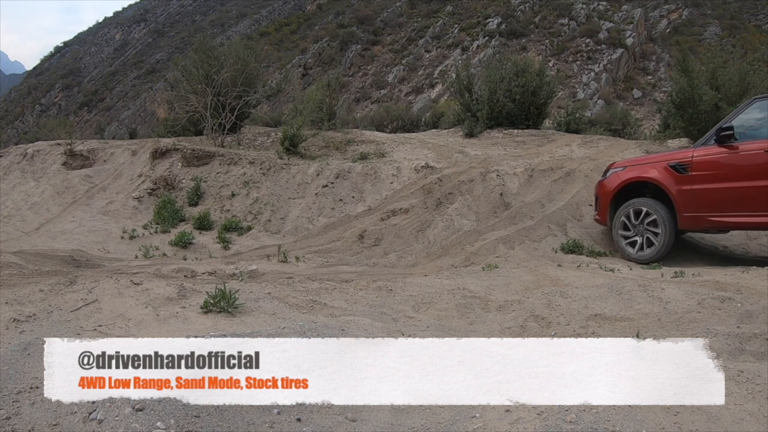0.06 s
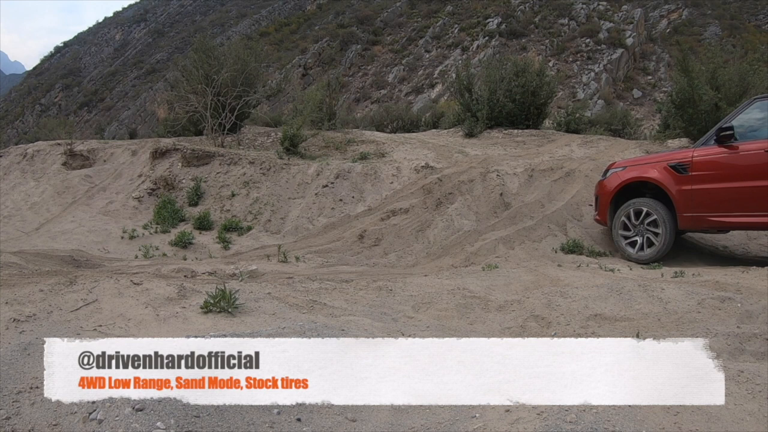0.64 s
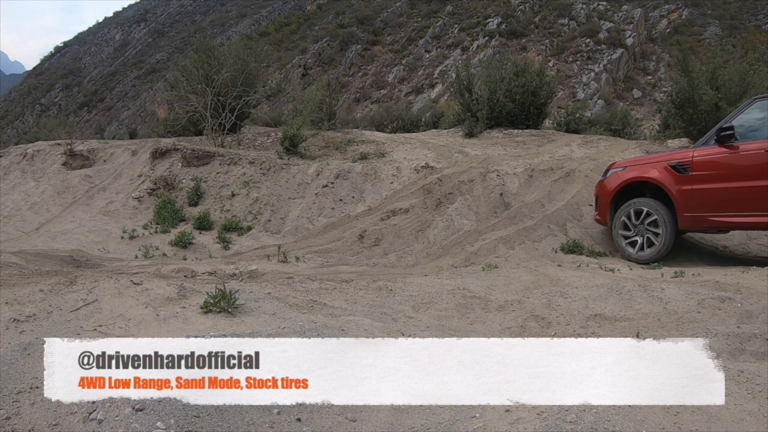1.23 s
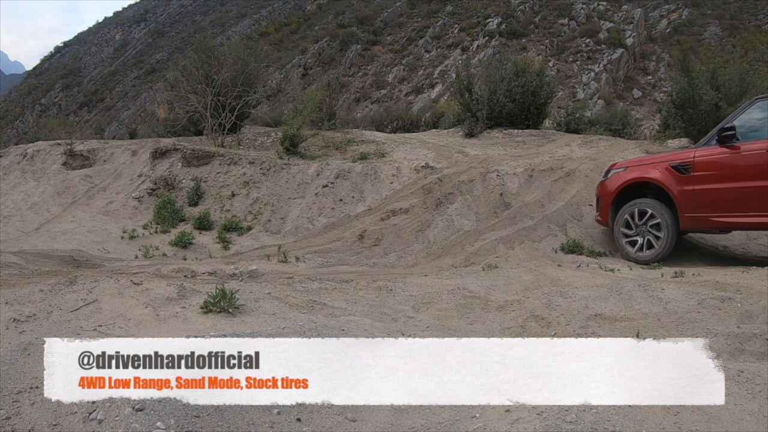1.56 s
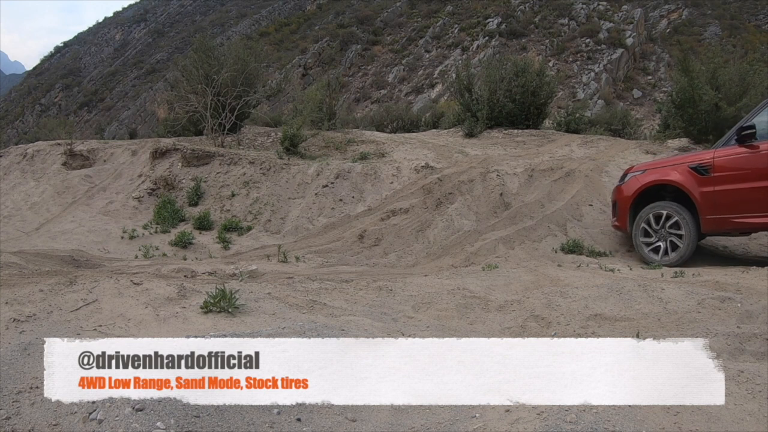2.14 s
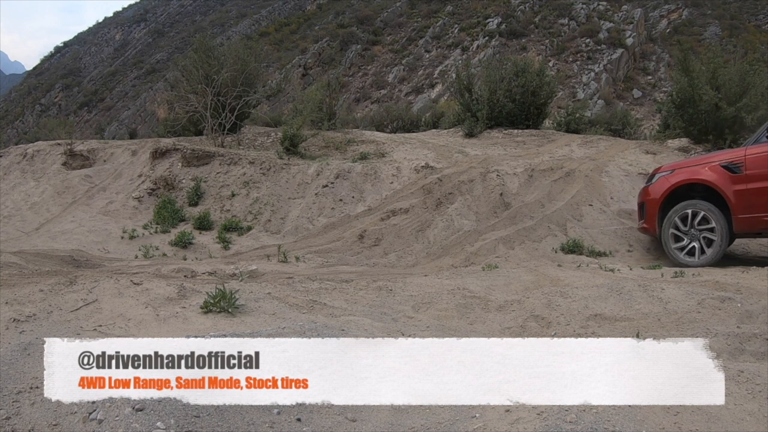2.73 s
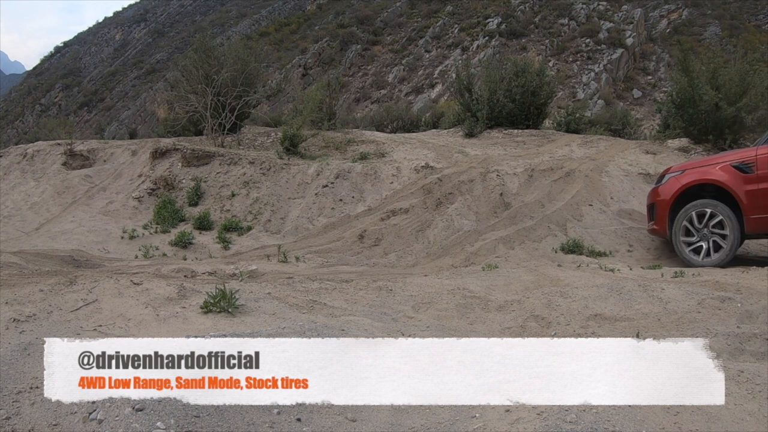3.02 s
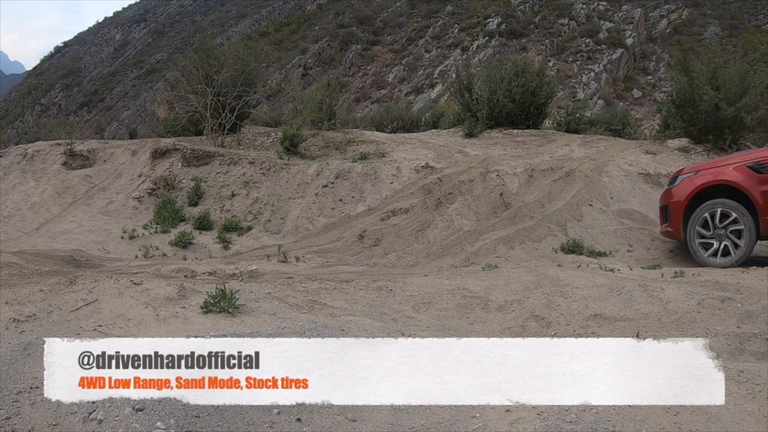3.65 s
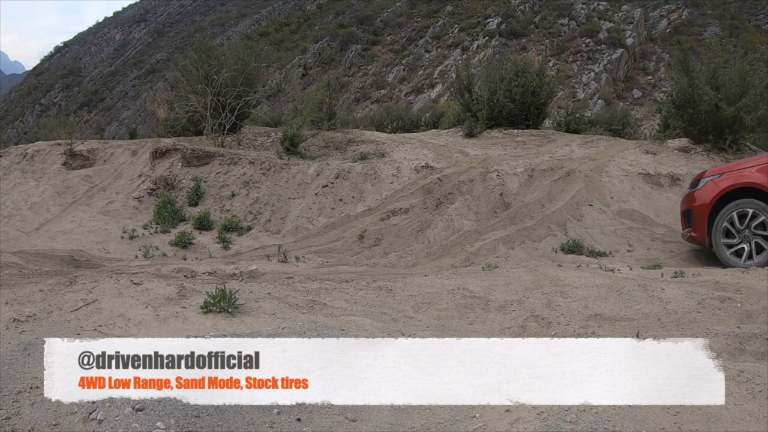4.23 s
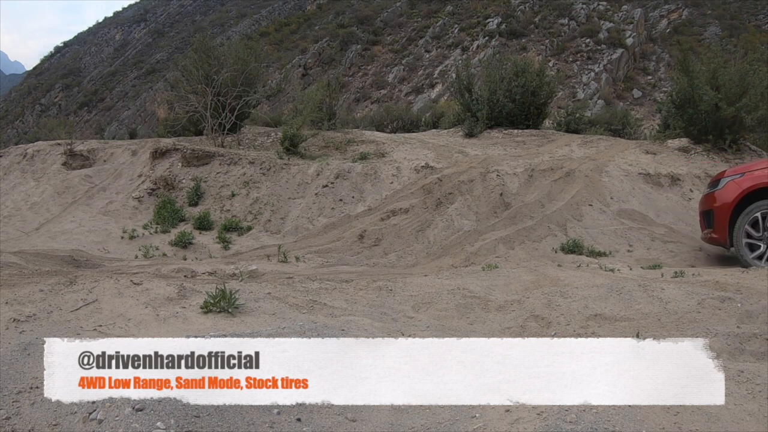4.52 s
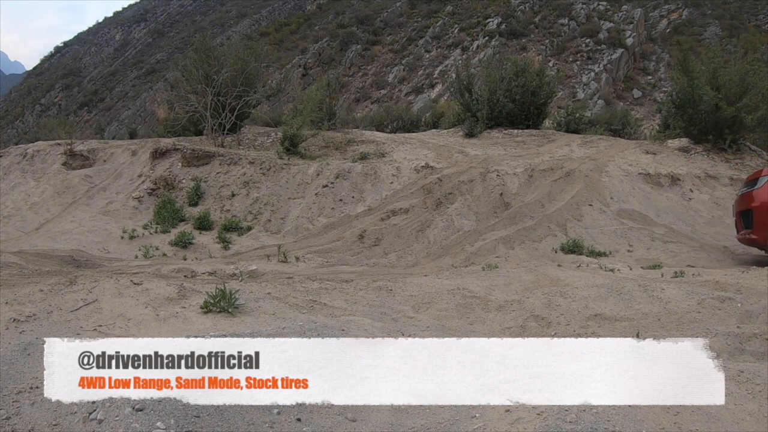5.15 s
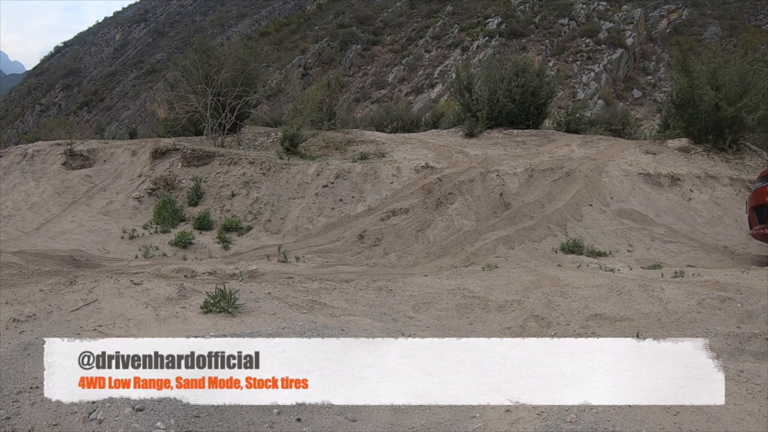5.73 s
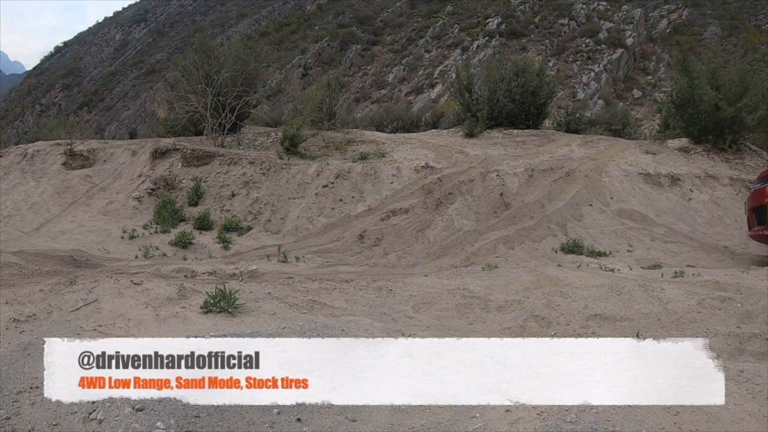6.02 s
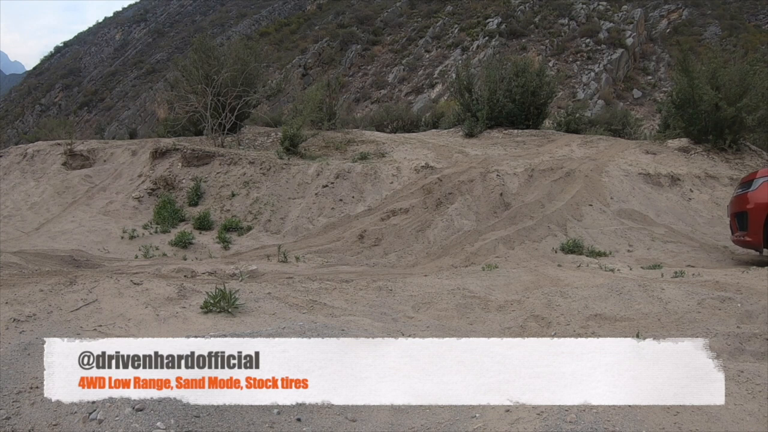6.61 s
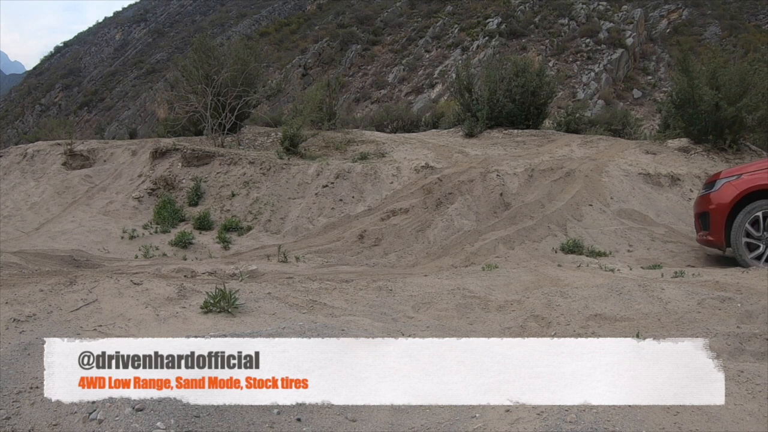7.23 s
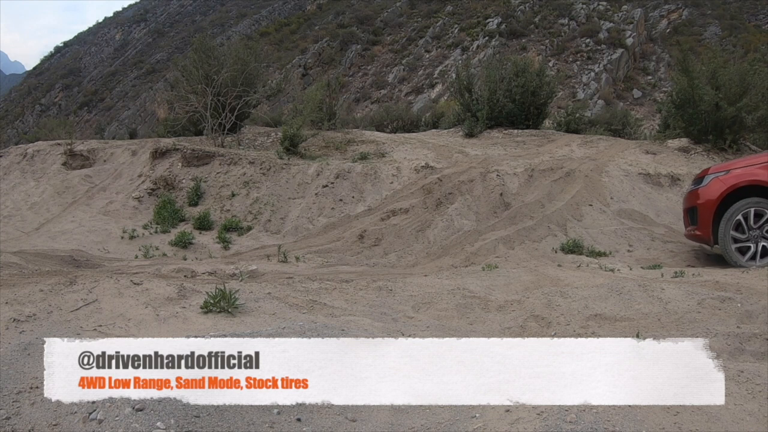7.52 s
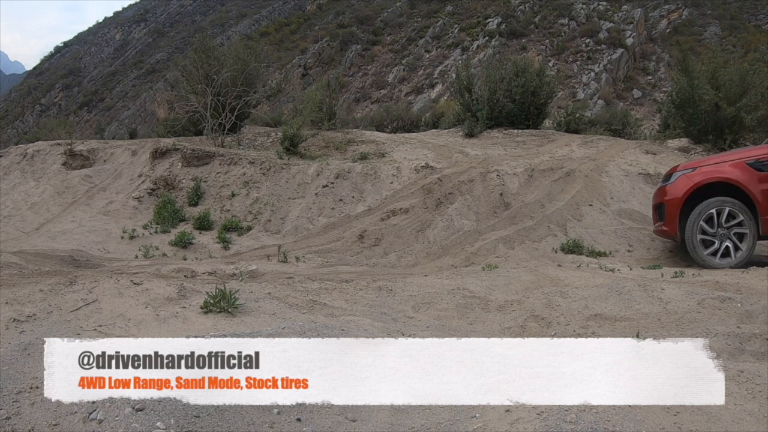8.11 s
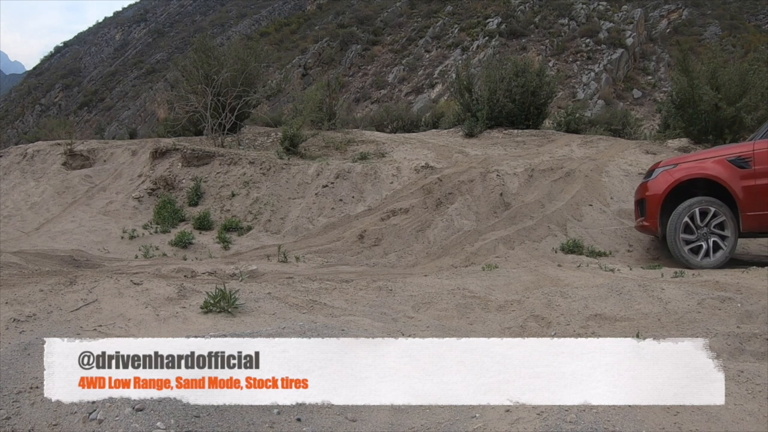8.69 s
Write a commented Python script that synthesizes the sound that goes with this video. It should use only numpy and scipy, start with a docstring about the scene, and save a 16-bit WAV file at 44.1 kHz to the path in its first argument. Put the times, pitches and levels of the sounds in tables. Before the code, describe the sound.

A large off-road vehicle's engine rumbles and revs once as its tyres grind sand and crack stones, with gusts of wind.

```python
"""Off-roader on a sandy slope

A V8 crawls a few metres to the right: it strains, rolls back, revs once and creeps forward. Its firing
pulses excite the exhaust, where the two banks boom in sum and burble in difference; the engine bay whirrs.
The tyres grind sand and crack stones, and blows set the rim and suspension ringing in their modes.
Small birds call far off in the valley air, and gusts of wind buffet the listener."""
import sys
import numpy as np
from scipy import signal
from scipy.fft import rfft, irfft, next_fast_len
from scipy.io import wavfile
from scipy.ndimage import uniform_filter1d

SR = 44100
rng = np.random.default_rng(int(sys.argv[2]) if len(sys.argv) > 2 else 0)


def transcribe(signal):
    """Save signal, clipped to [-1, 1], as a 16-bit WAV file at the path in sys.argv[1]."""
    frames = np.atleast_2d(signal).T
    limited = np.clip(frames, -1, 1)
    pcm = np.round(limited * 32767).astype(np.int16)
    wavfile.write(sys.argv[1], SR, pcm)


N = 386299
T = np.arange(N) / SR
FREQ = np.maximum(np.linspace(0, SR / 2, next_fast_len(N) + 1), 1)

# the eight cylinders in firing order: (bank as +1 or -1, level/dB)
FIRING_ORDER = [(1, 0), (-1, 0.9), (1, -1.5), (1, 0), (-1, 1), (1, -0.1), (-1, -1.5), (-1, 1.5)]


def exhaust(firings, octaves, load_db, scatter_db=0.47, jitter_s=.0001):
    """Source and filter: the banks' summed pulses boom; their difference burbles between the harmonics."""
    # spectral envelopes of the banks' sum, their difference and the turbulent gas: (f/Hz, level/dB)
    boom_response = [(15, -16.5), (35, -0.5), (48, 5.5), (76, -2), (90, -8.5), (118, -16), (138, -9),
                     (154, -12), (172, -20), (220, -29), (400, -42.5), (900, -70.5)]
    burble_response = [(15, -41.5), (27, -10), (36, 3.5), (47, 6.5), (60, 0.5), (95, -0.5), (120, 5.5),
                       (145, 3.5), (190, -5.5), (260, -19.5), (320, -17.5), (900, -49.5)]
    gas_spectrum = [(20, -25.5), (50, -4.5), (100, 1.5), (160, -1), (220, -6), (350, -20.5), (900, -39)]
    count = np.arange(1, int(firings[-1]))
    bank, cylinder_db = np.array(FIRING_ORDER)[count % len(FIRING_ORDER)].T
    late, strong = rng.standard_normal((len(count), 2)).T
    at = np.clip(np.interp(count, firings, np.arange(N)) + jitter_s * SR * late, 0, N - 2)
    size = undb(cylinder_db + scatter_db * strong)
    boom = steady(colour(impulses(at, size) - np.gradient(firings), boom_response))
    # the banks have pipes of their own, so the burble lags and fills the gaps between the booms
    burble = colour(impulses(at, size * np.sign(bank)), burble_response)
    burble = steady(muffler(burble, hz=140.3, width_hz=75))
    shade_db = -3 * swells([(6.3, 2.9, 0)])  # the vehicle is farthest down the slope at 6.3 s
    # under load the pulses outgrow the turbulent gas: the engine sounds cleaner when it pulls
    boom_db = -38 + 6 * octaves + load_db
    burble_db = -42.5 + 11.5 * octaves + 0.61 * load_db + shade_db
    gas_db = -43.5 + 10.5 * octaves + 0.19 * load_db
    pulses = boom * undb(boom_db) + burble * undb(burble_db)
    gas = unit(colour(rng.standard_normal(N), gas_spectrum)) * undb(gas_db)
    return lowpass(gas - muffler(pulses), 1200)  # the muffler's packing absorbs the treble


def muffler(x, hz=70, width_hz=60):
    """All-pass dispersion: the chambers delay the band around their resonance and smear every pulse."""
    radius = np.exp(-np.pi * width_hz / SR)
    poles = [1, -2 * radius * np.cos(2 * np.pi * hz / SR), radius * radius]
    return signal.lfilter(poles[::-1], poles, x)


def load(attack_s=0.074, sag_s=0.91, release_s=0.19):
    """Relaxation: exhaust pressure (dB over idle) builds, sags as the wheels slip, falls on release."""
    # presses of the accelerator: (t/s, time held/s, scale of the added pressure/dB re idle)
    presses = [(-.12, 0.85, 9), (.74, 0.48, 11), (1.4, 0.17, -2), (1.63, 0.18, 13), (2.02, 0.54, 6.5),
               (3.39, 0.74, 15), (4.6, 0.24, 0.5), (5.24, 0.89, 10.5), (6.27, 0.26, 7), (7.66, 0.28, 12.5),
               (8.51, 0.39, 11)]
    pressure = 1
    for s, held_s, db in presses:
        t = np.maximum(T - s, 0)
        build = 1 - np.exp(-t / attack_s)
        fall = np.exp(-t / sag_s - np.maximum(t - held_s, 0) / release_s)
        pressure = pressure + undb(db) * build * fall
    return 20 * np.log10(pressure)


def lope(firings, octaves, load_db, waver_db=1.2, pipe_cutoff_hz=205):
    """Periodicity: unequal cylinders repeat each engine cycle, adding lines between the harmonics."""
    # spectral lines: (multiple of the cycle rate, level/dB)
    orders = [(5, -9), (9, -5), (10, -.5), (13, -7), (14, -6.5), (15, -1), (18, -0.5), (20, -5), (22, -7.5),
              (26, -10)]
    cycles = firings / len(FIRING_ORDER)
    lines = sum(undb(db + waver_db * walk(2.6)) * np.sin(2 * np.pi * (order * cycles + rng.random()))
                for order, db in orders)
    return lowpass(lines, pipe_cutoff_hz) * undb(-51.5 + octaves + 0.64 * load_db)


def intake(firings, octaves, waver_db=1, idle_db=-52, db_per_octave=29):
    """Even harmonics of the firing rate drone in the intake and stand out only at high revs."""
    # partials of the drone: (multiple of the firing rate, level/dB)
    harmonics = [(2, -3.5), (4, -26.5), (6, -29.5)]
    drone = sum(undb(db + waver_db * walk(5.5)) * np.sin(2 * np.pi * k * firings) for k, db in harmonics)
    return drone * undb(idle_db + db_per_octave * octaves)


def engine_bay(firings, octaves, throb=0.041, flutter_db=1.0, panel_hz=452):
    """Flow noise of intake and fan grows with speed and throbs with the firings; a panel resonates."""
    # flow noise: (f/Hz, level/dB)
    spectrum = [(100, -12), (250, -4.5), (360, -0.5), (450, 0), (560, 0.5), (700, -1), (870, 0),
                (1050, -4.5), (1300, -11), (1900, -23.5), (3000, -27.5), (6000, -37)]
    # the panel hums most as the engine comes off load: (centre t/s, duration/s, level/dB re flow noise)
    hum_swells = [(2.1, 1, -6.5), (3.4, 11, -12)]
    rush = rng.standard_normal(N) * (1 + throb * np.cos(2 * np.pi * firings))
    rush *= undb(flutter_db * walk(14))
    hum = unit(band(rng.standard_normal(N), panel_hz - 13, panel_hz + 13)) * swells(hum_swells)
    return (unit(colour(rush, spectrum)) + hum) * undb(-46 + 6.5 * octaves)


def tyres(load_db, roll_db=-53, load_share=0.027, scrub_db=-6, bumps_db=1.0):
    """Cavity resonance: the air in the tyres rumbles; where they dig in it swells and the tread scrubs."""
    # the tyres dig in and churn: (centre t/s, duration/s, level/dB)
    digs = [(.3, 0.42, -42), (1.55, 2.68, -40.5), (8.68, 0.13, -48.5)]
    digging = swells(digs)
    cavity = band(band(rng.standard_normal(N), 157, 311), 157, 311)
    rumble = unit(cavity * undb(bumps_db * walk(12)))
    scrub = unit(band(rng.standard_normal(N), 290, 1010))
    return rumble * (undb(roll_db + load_share * load_db) + digging) + scrub * undb(scrub_db) * digging


def sand(grains_per_s=500, grain_db=-9):
    """Friction noise: sand ground by the tyres hisses, with grain impacts of power-law strength."""
    # grinding sand: (f/Hz, level/dB)
    spectrum = [(400, -15), (1200, 0.5), (2000, 0.5), (2500, 1.5), (3000, 4.5), (3400, 1.5), (3900, -4),
                (5500, -7.5), (6600, -5.5), (7400, 2), (8200, -15.5), (10000, -12.5), (12000, -33),
                (14500, -39)]
    # how hard the tyres grind: (t/s, level/dB)
    grind = [(0, -54.5), (.8, -55), (1.6, -53), (2.3, -54.5), (3.3, -55.5), (3.98, -49), (4.35, -54.5),
             (5.3, -57.5), (6.7, -60.5), (7.25, -56), (8.3, -56), (8.76, -53)]
    when, chance = rng.random((int(grains_per_s * N / SR), 2)).T
    size = np.maximum(chance, .01) ** -.4
    grains = unit(impulses(when * (N - 2), size * rng.choice([-1, 1], len(size))))
    hiss = rng.standard_normal(N) * undb(.5 * walk(18))
    return unit(colour(hiss + undb(grain_db) * grains, spectrum)) * undb(over_time(grind))


def scrunch(slips_per_s=900, uneven_db=3.0):
    """Stick-slip: the tread packs the sand, which gives way in dense, uneven little slips."""
    # packing sand: (f/Hz, level/dB)
    spectrum = [(200, -18), (350, -3.5), (570, 1), (950, -7), (1300, -17), (2500, -26), (6000, -46)]
    # surges of slipping: (centre t/s, duration/s, level/dB)
    surges = [(3.66, 0.35, -41.5), (3.97, 0.57, -43.5), (4.22, 0.17, -43), (4.5, 0.078, -49),
              (4.66, 0.16, -46), (5.06, 0.23, -49), (5.27, 0.21, -43.5), (8.72, 0.26, -51)]
    when, size = rng.random((int(slips_per_s * N / SR), 2)).T
    slips = impulses(when * (N - 2), size - .5)
    return unit(colour(slips, spectrum) * undb(uneven_db * walk(35))) * swells(surges)


def thuds(rise_s=0.0088, lo_hz=235, hi_hz=370):
    """Damped impact: a soft push on the tyre wall dies away in a few cycles."""
    # a tyre drops into a rut: (t/s, level/dB)
    drops = [(.958, -39), (4.724, -41), (5.922, -41.5)]
    out, t = np.zeros(N), T[:SR // 8]
    for s, db in drops:
        push = unit(band(rng.standard_normal(len(t)), lo_hz, hi_hz))
        add(out, s, undb(db) * push * t / rise_s * np.exp(1 - t / rise_s))
    return out


def stones(rise_s=.0028, tail_s=0.068, tail_db=-21, snap_s=0.063, click_width_hz=400):
    """Brittle fracture: a stone bursts and clicks at its own pitch; the slope scatters a short tail."""
    # stones under the tyres; knock, snap and click are relative to the crack:
    # (t/s, crack level/dB, knock level/dB, snap level/dB, click f/Hz, click level/dB, crush time/s)
    fractures = [(.937, -47, -8, -19, 2540, 3, 0.0091), (0.9596, -43.5, 7, -5, 2670, 2, 0.0076),
                 (1.175, -48, 9, -16, 3140, 8, .009), (1.301, -59, 17, -8, 3000, -3, 0.0082),
                 (1.3216, -37.5, 3, -12, 2920, -2, 0.01), (2.797, -46.5, -4, -8, 2900, -5, 0.0086),
                 (3.494, -45, -3, -6, 2920, 0, 0.0082), (3.6451, -42.5, -3, 9, 3334, -1, 0.0052),
                 (3.692, -50, -3, 0, 3930, -10, .012), (3.8637, -51.5, -5, 0, 3100, -9, 0.0094),
                 (4.7814, -53, 5, -21, 3270, -1, 0.0084), (5.9225, -50.5, 0, -3, 3190, -11, 0.013),
                 (6.135, -68, 17, -10, 2900, -1, 0.011), (6.188, -49, 10.5, -7, 4430, -3, 0.0092),
                 (6.3438, -51, 8, -8, 2700, -1, .012), (6.533, -58, 7, -11, 3040, 7, 0.0092),
                 (8.2607, -44, -2, -13, 3173, 0, .008), (8.6652, -50, -15, -8, 3000, -6, .008)]
    out, t = np.zeros(N), T[:SR // 2]
    for s, db, knock_db, snap_db, hz, click_db, crush_s in fractures:
        decay = np.exp(-t / crush_s) + undb(tail_db) * np.exp(-t / tail_s)
        burst = (1 - np.exp(-t / rise_s)) * decay * rng.standard_normal(len(t))
        snap = unit_hit(band(band(burst * np.exp(-t / snap_s), 6540, 8360), 6540, 8360))
        click = unit_hit(band(burst, hz - click_width_hz / 2, hz + click_width_hz / 2))
        crack = unit_hit(unit_hit(band(burst, 2150, 5100)) + undb(click_db) * click)
        knock = unit_hit(band(burst, 600, 1700))
        add(out, s - rise_s, undb(db) * (crack + undb(snap_db) * snap + undb(knock_db) * knock))
    return out


def metal(rattle_db=3.0, chatter_db=3.0, contact_s=.001, ping_at_s=3.645, ping_db=-23):
    """Modal ringing: struck by stones, the rim chatters and the suspension clunks; one pebble pings."""
    # modes of the rim, the suspension and the metal that the pebble hits: (f/Hz, level/dB, T60/s)
    rim_modes = [(1099, 9, .13), (1340, 1, .12), (1500, -9, .1), (1603, -6, 0.099), (1770, -13, .13),
                 (2217, -5, 0.15), (3130, -1, 0.11), (4250, -21, .09), (4570, -21, .11)]
    suspension_modes = [(577, -5.5, 0.57), (601, -15, .35), (560, -7, .16), (681, -7, 0.23),
                        (907, -10, 0.51)]
    ping_modes = [(2708, 0, .085), (3330, -7, .06), (5367, -13, .05), (7350, -6, .025), (7800, -1, .025),
                  (9250, -7, .028)]
    # blows on the rim, brighter for a harder contact: (t/s, level/dB, tilt/(dB per octave))
    rim_hits = [(.961, -42, 3), (1.175, -50, 8), (1.323, -39, 0), (6.188, -43, 1)]
    # blows that reach the suspension: (t/s, level/dB)
    clunks = [(.965, -37), (1.326, -45), (6.195, -33), (6.346, -39.5)]
    out, t = np.zeros(N), T[:SR // 2]
    onset = 1 - np.exp(-t / contact_s)
    for s, db, tilt in rim_hits:
        modes = [(hz, level + tilt * np.log2(hz / rim_modes[0][0]), t60) for hz, level, t60 in rim_modes]
        chatter = undb(db + chatter_db * walk(220)[:len(t)])
        add(out, s, chatter * onset * ring(modes, t, detune=0.0011, spot_db=2.7))
    for s, db in clunks:
        rattle = undb(db + rattle_db * walk(75)[:len(t)])
        add(out, s, rattle * onset * ring(suspension_modes, t, detune=.004))
    add(out, ping_at_s, undb(ping_db) * onset * ring(ping_modes, t))
    return out


def moan(centre_hz=174, glide_hz_per_s=-85, waver_hz=3):
    """Frequency glide: a low tone sinks as the vehicle rolls forward again."""
    # swell of the moan: (centre t/s, duration/s, level/dB)
    swell = [(7.37, 0.31, -42.5)]
    hz = centre_hz + glide_hz_per_s * (T - swell[0][0]) + waver_hz * walk(25)
    return swells(swell) * tone(hz)


def whistle(hz=8311, waver_hz=14, flicker_db=6.0):
    """Random modulation: a thin, high tone wavers and flickers as it swells and fades."""
    # swell of the whistle: (centre t/s, duration/s, level/dB)
    swell = [(8.18, 0.23, -54)]
    return swells(swell) * undb(flicker_db * walk(30)) * tone(hz + waver_hz * walk(120))


def wind(breeze_db=-47.5, flutter_db=6.0):
    """Turbulence: eddies buffet each side independently, the windward left one harder."""
    # buffeting pressure: (f/Hz, level/dB)
    spectrum = [(12, -34), (30, 9), (50, 14.5), (100, 5), (170, -1.5), (260, -16), (400, -13.5), (900, -55)]
    # gusts above the breeze: (centre t/s, duration/s, level/dB)
    gusts = [(1.55, 2.2, -28.5), (1.35, 0.12, -27.5), (2.8, 1, -40.5), (4.8, 1.1, -43.5), (5.6, 1.2, -49),
             (7.4, 1.1, -51)]
    sides = [unit(colour(rng.standard_normal(N), spectrum) * undb(flutter_db * walk(17)))
             for _ in range(2)]
    return np.array(sides) * np.array([[1], [.5]]) * (undb(breeze_db) + swells(gusts))


def birds(chirp_s=0.13):
    """Linear chirps: each distant call is a pure tone that glides up or down."""
    # calls: (t/s, centre f/Hz, glide/Hz, level/dB)
    calls = [(.38, 2420, -500, -63), (0.639, 2440, -600, -63), (1.09, 2260, 300, -59),
             (2.659, 2386, -600, -67), (6.04, 2493, -350, -65), (6.14, 2782, -400, -61),
             (6.85, 2227, 260, -62)]
    out, progress = np.zeros(N), np.linspace(0, 1, int(chirp_s * SR))
    for s, hz, glide_hz, db in calls:
        add(out, s, undb(db) * np.sin(np.pi * progress) * tone(hz + glide_hz * (progress - .5)))
    return out


def air(db=-61, drift_db=3.3):
    """Diffuse field: faint valley noise, uncorrelated between the ears."""
    # valley air: (f/Hz, level/dB)
    spectrum = [(30, 30.5), (100, -1), (300, -32), (700, 21.5), (1500, 13), (2600, 7.5), (4000, 1.5),
                (7000, 10), (10000, -5.5), (14000, -47)]
    sides = [unit(colour(rng.standard_normal(N), spectrum)) for _ in range(2)]
    return np.array(sides) * undb(db + drift_db * walk(1.86))


def from_right(x):
    """Stereo placement: midrange sits to the right, bass stays centred, treble spreads out of phase."""
    # the left channel relative to the right: (f/Hz, level/dB, phase/rad)
    left_response = [(100, 0, 0), (370, -.3, -.2), (560, -3, -.6), (690, -6.5, -1), (830, -16, -.9),
                     (980, -23, .3), (1400, -17, 1.3), (2000, -13, 0), (3700, -15, .3), (4800, -5, -1.3),
                     (6500, -4, -2.2), (8300, -1, -2.8), (9500, -2, -1), (11000, -1, 0)]
    db, phase = over_frequency(left_response)
    right = x * signal.windows.tukey(N, .003)
    left = irfft(rfft(right, 2 * next_fast_len(N)) * undb(db) * np.exp(1j * phase))[:N]
    return np.array([left, right])


def ring(modes, t, detune=0, spot_db=0):
    """Free decay of modes, whose strengths and pitches can stray with the spot that is struck."""
    out = 0
    for hz, db, t60 in modes:
        strong, sharp = rng.standard_normal(2)
        partial = np.sin(2 * np.pi * hz * (1 + detune * sharp) * t)
        out = out + undb(db + spot_db * strong) * partial * 1000 ** (-t / t60)
    return out


def tone(hz):
    """A sine whose phase is the integral of its frequency."""
    return np.sin(2 * np.pi * np.cumsum(hz) / SR)


def impulses(at, size):
    """Impulses at fractional sample positions."""
    whole = np.clip(at.astype(int), 0, N - 2)
    part = at - whole
    return np.bincount(whole, size * (1 - part), N) + np.bincount(whole + 1, size * part, N)


def walk(rate_hz):
    """Smooth random drift with an rms of 1."""
    hold = max(int(SR / rate_hz), 1)
    steps = np.repeat(rng.standard_normal(N // hold + 1), hold)[:N]
    return unit(uniform_filter1d(steps, hold))


def swells(table):
    """Summed raised-cosine gains from rows of (centre t/s, duration/s, level/dB)."""
    return sum(undb(db) * np.cos(np.pi * np.clip((T - s) / length, -.5, .5)) ** 2
               for s, length, db in table)


def over_time(table):
    """Linear interpolation of (t/s, value) rows."""
    return np.interp(T, *np.transpose(table))


def over_frequency(table):
    """Linear interpolation of each column in log frequency."""
    hz, *columns = np.transpose(table)
    return [np.interp(np.log(FREQ), np.log(hz), column) for column in columns]


def colour(x, response):
    """Minimum-phase filter with the given (f/Hz, level/dB) response."""
    half = len(FREQ) - 1
    cepstrum = irfft(np.log(undb(over_frequency(response)[0])))
    cepstrum[1:half] *= 2
    cepstrum[half + 1:] = 0
    return irfft(rfft(x, 2 * half) * np.exp(rfft(cepstrum)))[:N]


def band(x, lo_hz, hi_hz):
    """Band-pass filter."""
    return signal.sosfilt(signal.butter(2, [lo_hz, hi_hz], "band", fs=SR, output="sos"), x)


def lowpass(x, hz, order=4):
    """Low-pass filter."""
    return signal.sosfilt(signal.butter(order, hz, fs=SR, output="sos"), x)


def undb(db):
    """Decibels to gain."""
    return 10 ** (np.asarray(db) / 20)


def unit(x):
    """Scale to rms 1."""
    return x / np.sqrt(np.mean(x ** 2))


def unit_hit(x):
    """Scale a hit to rms 1 over its first 20 ms."""
    return x / np.sqrt(np.mean(x[:SR // 50] ** 2))


def steady(x):
    """Hold the rms near 1 over a quarter of a second."""
    return x / np.sqrt(uniform_filter1d(x ** 2, size=SR // 4) + 1e-18)


def add(out, s, x):
    """Mix x in at time s."""
    start = max(int(s * SR), 0)
    out[start:start + len(x)] += x[:max(N - start, 0)]


def scene(idle_hz=40):
    """Superposition: the vehicle on the right, with a thin whistle, birds, air and wind around it."""
    # engine speed: (t/s, firing rate f/Hz)
    speed = [(0, 42.5), (.92, 42.16), (1.2, 45.8), (1.4, 50.3), (1.82, 52.52), (2.27, 48.22), (2.5, 43.54),
             (3.3, 37.21), (3.41, 38.34), (3.88, 71.46), (4.09, 78.22), (4.4, 62.84), (4.8, 52.86),
             (5, 50.5), (5.14, 46.08), (5.5, 43.94), (6.5, 42.22), (6.95, 39.51), (7.25, 38.9),
             (7.52, 35.38), (7.75, 39.67), (8.29, 40.58), (8.46, 39.26), (8.76, 43.1)]
    firing_hz, load_db = over_time(speed), load()
    firings = np.cumsum(firing_hz) / SR  # running count
    octaves = np.log2(firing_hz / idle_hz)  # speed above idle
    engine = exhaust(firings, octaves, load_db) + lope(firings, octaves, load_db)
    engine += intake(firings, octaves) + engine_bay(firings, octaves)
    wheels = tyres(load_db) + sand() + scrunch() + thuds() + stones() + metal() + moan()
    return from_right(engine + wheels) + whistle() + birds() * np.array([[1], [.7]]) + air() + wind()


def record(dry, dull_hz=10300, top_hz=14400):
    """Band limiting: the top octave is dulled, then cut off steeply."""
    dull = lowpass(dry, dull_hz, order=3)
    return signal.sosfilt(signal.ellip(8, .2, 70, top_hz, fs=SR, output="sos"), dull)


dry = scene()
out = record(dry)
transcribe(out)
```